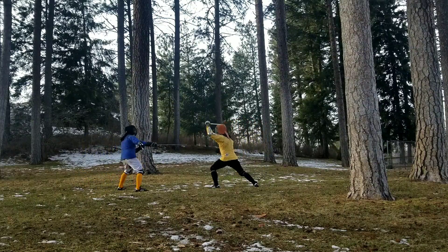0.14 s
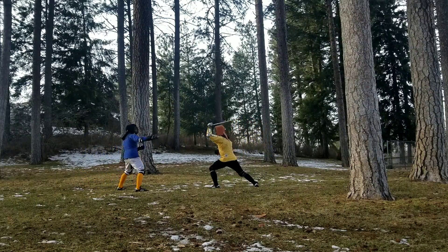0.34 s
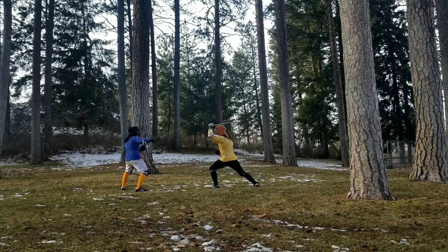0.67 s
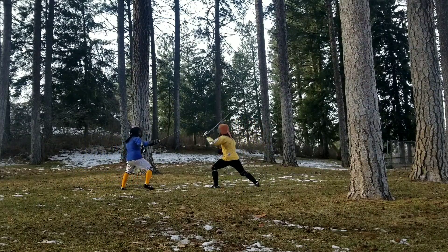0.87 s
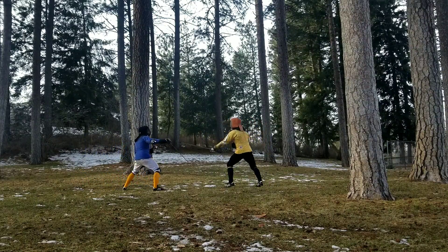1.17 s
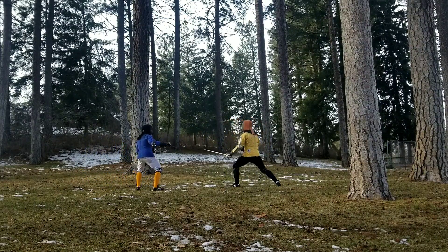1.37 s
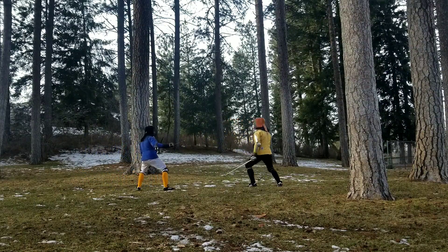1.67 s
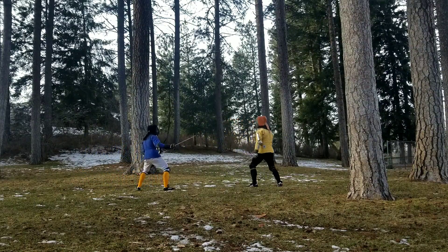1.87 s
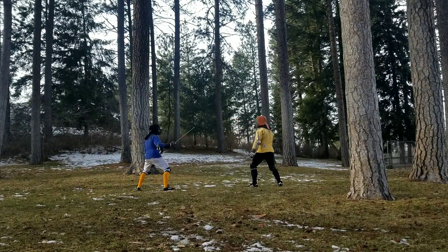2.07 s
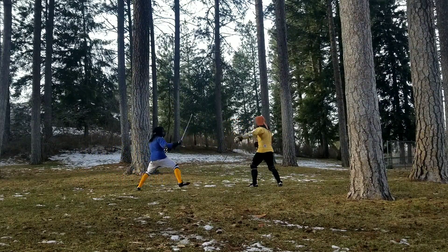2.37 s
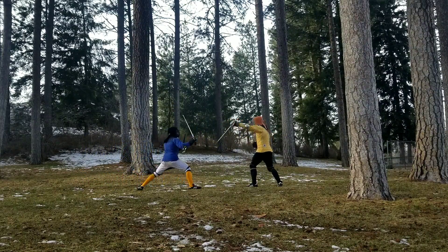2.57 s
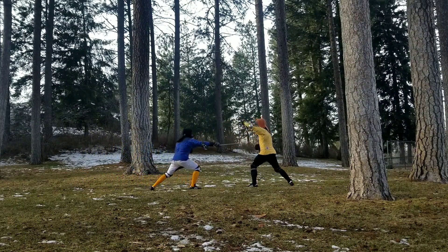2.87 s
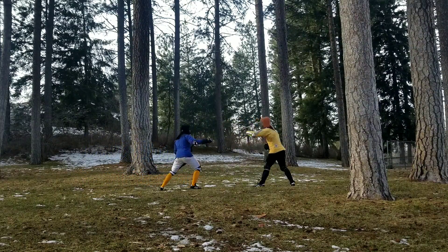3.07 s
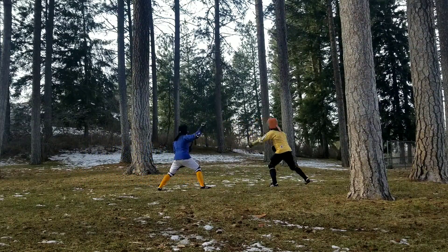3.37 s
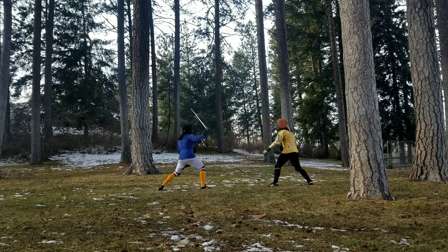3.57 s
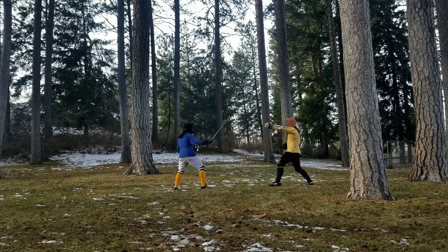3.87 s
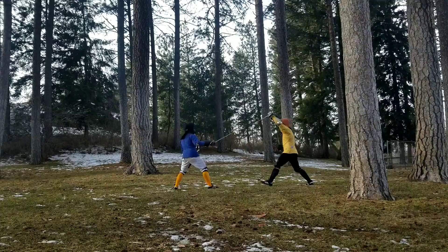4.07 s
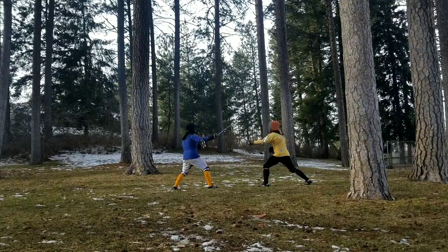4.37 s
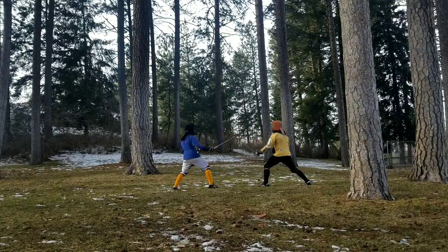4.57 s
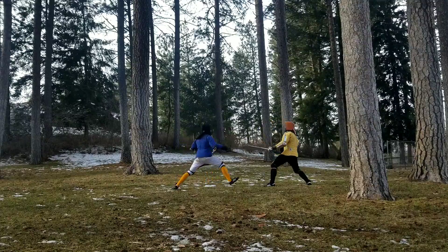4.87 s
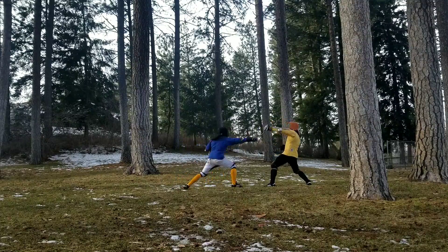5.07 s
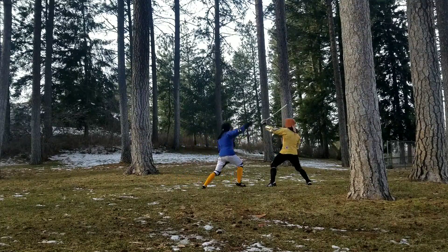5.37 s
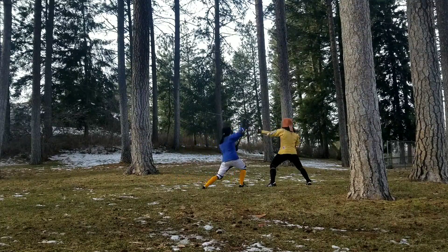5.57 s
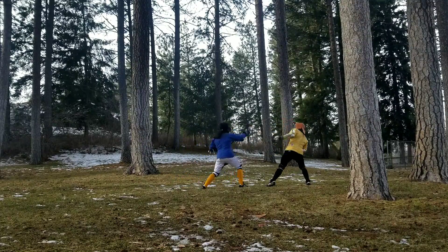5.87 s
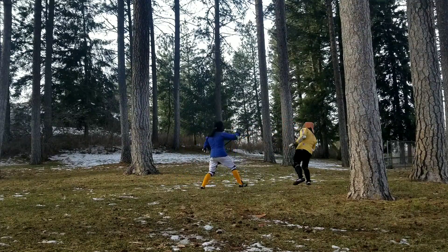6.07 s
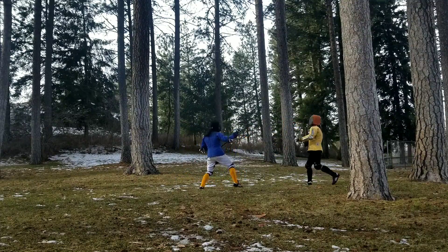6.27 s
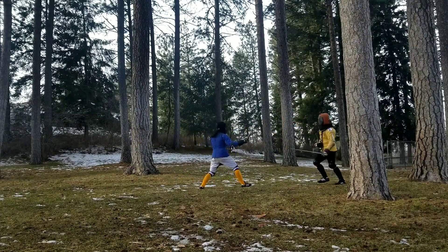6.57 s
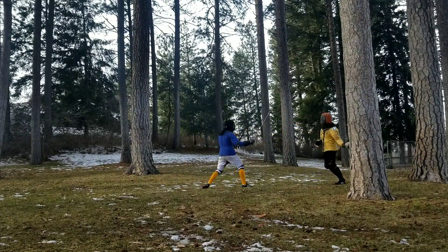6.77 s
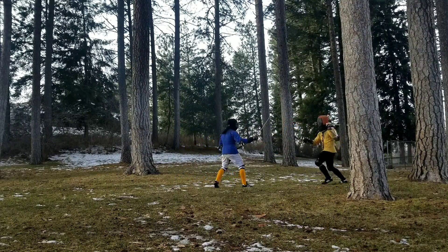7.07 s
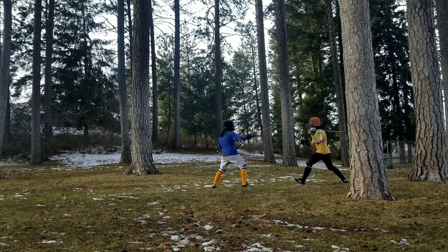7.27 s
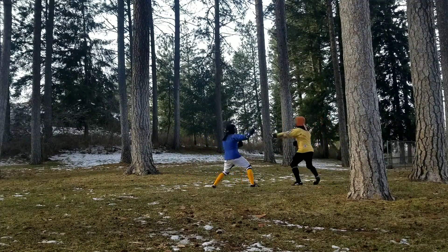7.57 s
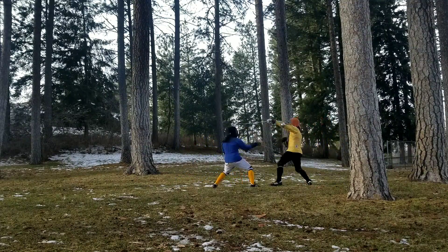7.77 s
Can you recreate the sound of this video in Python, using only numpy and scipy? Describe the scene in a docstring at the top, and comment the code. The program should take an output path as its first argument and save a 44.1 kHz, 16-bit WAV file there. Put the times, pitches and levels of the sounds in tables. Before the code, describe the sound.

Two fencers spar outdoors: sparse bright metallic clacks with short woodland echo, muffled knocks and scuffing feet over faint deep rumble.

```python
"""Steel swords clash as two fencers spar among tall pines: each blow excites broad blade resonances,
a low knock, a high sizzle and a thin ring, and the trunks scatter it into a smooth reverberant tail.
Blades also slide in uneven friction noise. Padded gear knocks as damped sines with puffs of noise,
shoes scuff and pat the turf, and faint tones waver.
Shaped noise gives a low, distant rumble, a soft rush in the pines and a faint hiss."""
import sys
import numpy as np
from scipy import signal
from scipy.fft import rfft, irfft, next_fast_len
from scipy.io import wavfile
from scipy.ndimage import uniform_filter1d, map_coordinates

SR = 44100
rng = np.random.default_rng(int(sys.argv[2]) if len(sys.argv) > 2 else 0)


def generate_wav(sig):
    """Save sig (samples, or channels by samples) to the path in sys.argv[1] as 16-bit PCM at SR."""
    pcm = np.round(np.clip(np.atleast_2d(sig).T, -1, 1) * 32767).astype(np.int16)
    wavfile.write(sys.argv[1], SR, pcm)


N = 349713
T = np.arange(SR // 2) / SR  # time axis of one event, s
HZ = np.fft.rfftfreq(2 ** 16, 1 / SR)  # frequency axis of the burst colours, Hz

# blade on blade: [t/s, level/dB, knock/dB, strongest mode f/Hz, mode/dB, chatter t60/s];
# knock and mode are relative to the level
BLOWS = [(1.096, -22, -3.5, 1640, -.5, .046), (2.79, -34.5, 2, 1163, 1, 0.06),
         (3.353, -29, -1.5, 3100, -10, 0.051), (3.357, -28, -1.5, 4260, -6, 0.088),
         (4.468, -21, -7, 4055, 6, 0.078), (5.079, -40.5, -2.5, 1025, 6.5, 0.051),
         (5.537, -28.5, -1.5, 6450, 6.5, 0.055), (5.553, -35.5, -2, 4420, -9, 0.096),
         (5.59, -37.5, 1.5, 1250, 1, 0.053), (5.857, -30.5, -5, 1130, 2, 0.068),
         (5.882, -36.5, -5, 4450, 6.5, 0.052), (7.285, -50, 6, 1023, 4, 0.078),
         (7.567, -24, -1.5, 4510, 1, 0.065), (7.884, -35, 8.5, 1624, 12, 0.022),
         (7.887, -30, -1.5, 3020, 9, .028)]
# slides or brushes of one blade along the other: [t/s, length/s, level/dB]
SLIDES = [(2.808, 0.045, -38.5), (4.38, 0.026, -59.5), (5.401, 0.057, -64)]
# dull knocks on gear and ground: [t/s, level/dB, f/Hz]
KNOCKS = [(1.062, -35.5, 510), (1.097, -31, 453), (1.222, -28, 276), (1.368, -31.5, 280), (1.662, -30, 248),
          (1.695, -30.5, 950), (1.755, -32.5, 720), (2.503, -31.5, 780), (2.902, -17.5, 1130),
          (2.903, -30.5, 520), (5.479, -26.5, 230), (5.519, -19.5, 58.55), (7.883, -25.5, 228)]
# scuffs of shoes and clothing, before the gains of their two bands: [t/s, level/dB]
SCUFFS = [(.251, -49), (1.003, -47), (1.051, -34.5), (2.299, -54), (3.721, -47), (4.151, -44.5),
          (5.232, -44), (5.29, -43)]
# flurries of steps on the turf: [middle t/s, length/s, level/dB]
FLURRIES = [(.15, .7, -47), (1.501, 0.97, -40), (3.2, 1.6, -38), (7.053, .8, -50.5)]
# faint, thin whistles: [t/s, length/s, mean f/Hz, level/dB]
WHISTLES = [(.2, 0.15, 1846, -58), (6.027, 0.17, 1992, -61.5)]

# broad resonances of the gripped swords: [f/Hz, half-power width/Hz, level/dB]
SWORD_MODES = [(1660, 370, -24.5), (2820, 380, -17.5), (3600, 200, -11), (4270, 420, -3.5),
               (5370, 110, -7.5), (6580, 82, -15.5), (7030, 120, -4.5), (8050, 57, -2.5), (8900, 130, -14),
               (10550, 310, -12.5), (12210, 330, -14)]
# thin, longer ring of the steel, before random detuning and strength: [f/Hz, level/dB, t60/s]
RING_MODES = [(2783, -1, .6), (3070, 0, .35), (3665, 0, .3), (3983, 0, .3), (4282, 0, .3), (5396, -3, .3),
              (6420, 0, .55), (7580, -1, .35), (7925, -5, .3), (8704, -5, .3), (9776, 1, .45),
              (11420, -4, .25), (12558, -2, .2)]
# relative spectrum of the low register of a clash: [f/Hz, level/dB per Hz]
KNOCK_SPECTRUM = [(100, -17), (300, -5.5), (450, -9.5), (600, -12), (800, -2), (1250, -0.5), (1800, -2),
                  (2150, -5.5), (3200, -25)]
# relative spectrum of the middle register: [f/Hz, level/dB per Hz]
CLANG_SPECTRUM = [(1500, -32), (2300, -3), (2900, 0), (4300, -2), (5400, -4.5), (6200, -7), (9000, -33.5)]
# relative spectrum of the high register: [f/Hz, level/dB per Hz]
SIZZLE_SPECTRUM = [(4000, -28), (6000, -11), (8000, 4), (9500, 0.5), (12000, 4.5), (14600, 0.5)]
# relative spectrum of brushed turf: [f/Hz, level/dB per Hz]
TURF_SPECTRUM = [(500, -20.5), (1500, -6), (3500, 3.5), (6000, -4), (12000, -25)]

# stereo balance of the direct sound: [f/Hz, left minus right/dB]
DIRECT_PAN = [(300, -2.5), (900, -9), (1600, -8.5), (3000, -12.5), (4500, -13), (6000, -0.5), (8000, 0.5),
              (14000, -1)]
# stereo balance of the scattered tail: [f/Hz, left minus right/dB]
WOOD_PAN = [(200, 6.5), (700, -8), (2400, -6), (4400, -6), (8000, 0.5)]
# decay time of the scattered tail: [f/Hz, t60/s]
WOOD_T60 = [(300, .8), (1200, 1.15), (3000, 1.03), (6000, 0.62), (13000, 0.49)]
# colour of the scattered tail: [f/Hz, level/dB]
WOOD_COLOUR = [(150, -8.5), (400, -8), (1000, -1), (2500, -1.5), (4300, -3), (7000, 4.5), (14000, 3.5)]

# relative spectrum of the distant rumble: [f/Hz, level/dB per Hz]
RUMBLE_SPECTRUM = [(18, -57), (25, -42.5), (31, -29.5), (40, 0.5), (55, -2), (80, 4), (98, 2.5), (125, 0.5),
                   (155, -5.5), (200, -5), (260, -9), (330, -18), (430, -21.5), (700, -64.5)]
# course of the rumble, before a common offset and random wobble: [t/s, level/dB]
RUMBLE_COURSE = [(0.0, -40), (0.49, -40.5), (2.45, -43), (2.98, -40.5), (6.67, -45), (7.07, -41),
                 (7.93, -45.5)]
# relative spectrum of the rush in the pines: [f/Hz, level/dB per Hz]
RUSH_SPECTRUM = [(250, -14.5), (450, 2.5), (620, 4.5), (800, 10.5), (1050, 10), (1400, 6), (1900, 1.5),
                 (2400, -11.5), (3600, -17), (5000, -26.5), (7000, -97), (10000, -67)]
# relative spectrum of the microphone hiss: [f/Hz, level/dB per Hz]
HISS_SPECTRUM = [(4000, -22), (8000, -19), (9800, -12), (11000, -2), (12500, 0), (14600, -.5)]
# stereo balance of the background and the dull knocks: [f/Hz, left minus right/dB]
AIR_PAN = [(100, -3), (700, -5.5), (1300, -6.5), (2400, -9.5), (4400, -10), (8000, -1.5)]
# left-right correlation of the background before panning: [f/Hz, correlation]
AIR_ALIKE = [(60, 0.97), (130, 0.97), (290, 0.82), (640, 0.14), (1400, 0)]

USUAL_BLOW_DB = -32  # a blow of middling strength
# ring and sizzle of a middling blow, relative to it, and their dB for each dB of the blow;
# growth below 1 gives light touches relatively more of both
RING_DB, RING_GROWTH = -25, 0.72
SIZZLE_DB, SIZZLE_GROWTH = 1.5, 0.9
SLIDE_RISE_S, SLIDE_T60 = .004, 0.078
KNOCK_CYCLES = 12.3  # a knock loses 60 dB within this many cycles
STANCE_DB = -58  # the feet shift a little all the time
RUSH_DB, RUSH_EASE_DB_PER_S = -54, 0.52  # the breeze in the pines slowly drops
TOP_HZ = 14720  # band limit of the whole sound


def clashes(clang_db=2, contact=0.00086, mode_t60=0.035, rise=0.00027):
    """Impact excitation: chattering blades drive modes that the grip damps, all but a thin ring."""
    out = np.zeros((2, N))
    ring_hz, ring_level, ring_t60 = np.transpose(RING_MODES)[:, :, None]
    onset = 1 - np.exp(-T / rise)
    for s, db, knock_db, mode_hz, mode_db, t60 in BLOWS:
        envelope = onset * fade(t60, np.maximum(T - contact, 0))
        above_usual = db - USUAL_BLOW_DB
        sizzle_db = SIZZLE_DB + (SIZZLE_GROWTH - 1) * above_usual
        clack = blade_noise(envelope, (knock_db, clang_db, sizzle_db), alike=0.85, spiky=.65)
        # the place of contact picks one mode above the others and gives the ring new strengths
        mode = amp(mode_db) * np.sin(2 * np.pi * mode_hz * T) * fade(mode_t60)
        strength, detune = rng.standard_normal((2, len(RING_MODES), 1))
        tones = np.sin(2 * np.pi * ring_hz * (1 + 0.0024 * detune) * T)
        ring = amp(ring_level + 1.2 * strength) * tones * fade(ring_t60)
        ring_db = RING_DB + (RING_GROWTH - 1) * above_usual
        tonal = onset * (mode + amp(ring_db) * ring.sum(axis=0))
        add(out, s, among_trees(amp(db) * (clack + tonal), wet_db=-9.5))
    return out


def slides(knock_db=-6, sizzle_db=-4, judder_db=2.5):
    """Friction excitation: edge grates on edge under an uneven pressure that bites and lets go."""
    out = np.zeros((2, N))
    for s, length, db in SLIDES:
        pressure = (1 - np.exp(-T / SLIDE_RISE_S)) * fade(SLIDE_T60, np.maximum(T - length, 0))
        envelope = pressure * amp(db + judder_db * wobble(330)[:len(T)])
        grate = blade_noise(envelope, (knock_db, 0, sizzle_db), spiky=0.97)
        add(out, s, among_trees(grate, wet_db=-8.5, build=0.026))
    return out


def blade_noise(envelope, levels_db, **grain):
    """Superposition: low, middle and high registers are radiated through one steel response."""
    body = steel()
    shapes = (KNOCK_SPECTRUM, CLANG_SPECTRUM, SIZZLE_SPECTRUM)
    return sum(amp(level) * burst(envelope, body * amp(along(shape, HZ)), **grain)
               for shape, level in zip(shapes, levels_db))


def steel(dense_db=-10, uneven_db=2.5):
    """Modal response at one place of contact: broad resonances over a dense bed of bending modes."""
    peaks = sum(amp(db) ** 2 / (1 + (2 * (HZ - hz) / width) ** 2) for hz, width, db in SWORD_MODES)
    place = rng.standard_normal(len(HZ))
    place = unit(uniform_filter1d(uniform_filter1d(place, size=200), size=200))
    return np.sqrt(peaks + amp(dense_db) ** 2) * amp(uneven_db * place)


def burst(envelope, gain, alike=0.89, spiky=0.95):
    """Shot noise: a stereo swarm of tiny contacts rings through a minimum-phase colour."""
    noise = rng.standard_normal((3, len(T))) * np.exp(spiky * rng.standard_normal(len(T)))
    share = np.clip(alike, 0, 1)
    force = envelope * (np.sqrt(share) * noise[0] + np.sqrt(1 - share) * noise[1:])
    # folding the cepstrum onto positive time makes the colour causal
    cepstrum = irfft(np.log(gain + 1e-6))
    n = len(cepstrum)
    colour = np.exp(rfft(2 * cepstrum[:n // 2], n))
    x = irfft(rfft(force, n) * colour)[:, :len(T)]
    return unit(x) * np.sqrt(np.mean(envelope ** 2))


def among_trees(x, wet_db, build=0.0066, lead=2.4e-5):
    """Multiple scattering: direct sound meets two ports a hair apart; in the tail the treble dies first."""
    hz, t, z = signal.stft(rng.standard_normal((2, SR)), SR, nperseg=256)
    # single trunks throw back glints, so the tail shimmers
    glints = uniform_filter1d(rng.standard_normal(z.shape[1:]), size=3, axis=0)
    glints = unit(uniform_filter1d(glints, size=7, axis=1))
    z = z * amp(2.2 * glints)
    decay = fade(along(WOOD_T60, hz)[:, None], t)
    tail = signal.istft(z * decay, SR, nperseg=256)[1][:, :SR]
    tail = tail * (1 - np.exp(-np.arange(SR) / SR / build))
    # every direction carries other fine detail, so the tail keeps only the broad colour
    power = np.mean(np.abs(rfft(x)) ** 2, axis=0)
    power = uniform_filter1d(uniform_filter1d(power, size=1000), size=700)

    def tail_response(f):
        """Spectral smoothing: the broad source spectrum is weighted by the wood's colour and balance."""
        broad = np.sqrt(np.abs(np.interp(f, np.fft.rfftfreq(len(T), 1 / SR), power)))
        return broad * sides(along(WOOD_PAN, f)) * amp(wet_db + along(WOOD_COLOUR, f))

    def direct_response(f):
        """Interaural-style difference: level balance and a right-hand delay of lead seconds."""
        late = np.exp(-2j * np.pi * f * lead * np.array([[0], [1]]))
        return sides(along(DIRECT_PAN, f)) * late

    out = filtered(tail / np.linalg.norm(tail[0]), tail_response)
    add(out, 0, filtered(x, direct_response))
    return out


def knocks(puff_db=-5):
    """Heavily damped oscillation: a few cycles of one low mode and a puff of noise around it."""
    out = np.zeros((2, N))
    for s, db, hz in KNOCKS:
        envelope = (1 - np.exp(-T * hz)) * fade(KNOCK_CYCLES / hz)
        puff = burst(envelope, 1 / np.sqrt(1 + (HZ / hz - hz / (HZ + 1)) ** 4))
        tone = envelope * np.sin(2 * np.pi * hz * T)
        add(out, s, amp(db) * (tone + amp(puff_db) * puff))
    return filtered(out, lambda hz: sides(along(AIR_PAN, hz)))


def scuffs(turf_db=-14, treble_db=-10, rise=.006, t60=.09):
    """Friction noise: short brushes of shoes on turf and of stiff clothing."""
    out = np.zeros((2, N))
    envelope = (1 - np.exp(-T / rise)) * fade(t60)
    for s, db in SCUFFS:
        low = amp(turf_db) * burst(envelope, amp(along(TURF_SPECTRUM, HZ)), spiky=.6)
        high = amp(treble_db) * burst(envelope, amp(along(SIZZLE_SPECTRUM, HZ)), spiky=0.78)
        add(out, s, among_trees(amp(db) * (low + high), wet_db=-27.5))
    return out


def patter(count=520, centre_hz=600, spread=0.5, cycles=7.5, scatter_db=5.0, pat_db=-1):
    """Lossy yielding: damp turf gives under the shifting feet in small, dull, damped sines."""
    out, t = np.zeros((2, N)), T[:SR // 10]
    for s, (pitch, size, pan) in zip(rng.uniform(0, N / SR, count), rng.standard_normal((count, 3))):
        hz = centre_hz * np.exp(spread * np.clip(pitch, -2, 2))
        gain = footwork(s) * amp(pat_db + scatter_db * np.clip(size, -2, 2))
        pat = np.sin(2 * np.pi * hz * t) * (1 - np.exp(-2 * t * hz)) ** 2 * fade(cycles / hz, t)
        add(out, s, gain * sides(3 * pan - 5) * pat)
    return out


def footwork(s):
    """Excitation strength of the feet at time s, as a gain: each flurry swells and settles."""
    middle, length, db = np.transpose(FLURRIES)
    swell = np.cos(np.pi * np.clip((s - middle) / length, -.5, .5))
    return amp(STANCE_DB) + np.sum(amp(db) * swell)


def whistles(waver=0.0055):
    """Frequency modulation: faint, thin tones waver at random as they swell and vanish."""
    out = np.zeros((2, N))
    for s, length, hz, db in WHISTLES:
        phase = 2 * np.pi * np.cumsum(hz * (1 + waver * wobble(55)[:len(T)])) / SR
        swell = np.sin(np.pi * np.minimum(T / length, 1))
        add(out, s, amp(db) * sides(-7) * np.sin(phase) * swell)
    return out


def air(rumble_db=1.37, hiss_db=-79):
    """Stationary noise, slowly modulated: far rumble, soft rush in the pines, steady microphone hiss."""
    t = np.arange(N) / SR
    rumble_course = np.interp(t, *np.transpose(RUMBLE_COURSE)) + rumble_db
    rumble = amp(rumble_course + 1.3 * wobble(4.5)) * wash(RUMBLE_SPECTRUM)
    rush = amp(RUSH_DB - RUSH_EASE_DB_PER_S * t + 1.4 * wobble(14)) * wash(RUSH_SPECTRUM)
    return rumble + rush + amp(hiss_db) * wash(HISS_SPECTRUM)


def wash(spectrum):
    """Diffuse field: the bass is alike on both sides, the treble unrelated."""
    def mid_side(hz):
        """Correlation as an angle: cosine and sine share the power between mid and side."""
        turn = np.arccos(np.clip(along(AIR_ALIKE, hz), -1, 1)) / 2
        return amp(along(spectrum, hz)) * [np.cos(turn), np.sin(turn)]

    mid, side = filtered(rng.standard_normal((2, N)), mid_side)
    pair = np.array([mid + side, mid - side]) / mid.std()
    return filtered(pair, lambda hz: sides(along(AIR_PAN, hz)))


def amp(db):
    """Level to amplitude: 20 dB is a factor of ten."""
    return 10 ** (np.asarray(db) / 20)


def unit(x):
    """Normalisation: x at rms 1."""
    return x / np.sqrt(np.mean(x ** 2) + 1e-20)


def along(points, hz):
    """Interpolation: (f/Hz, value) points read on a logarithmic frequency axis."""
    f, v = np.transpose(points)
    return np.interp(np.log(hz + 1), np.log(f + 1), v)


def fade(t60, t=T):
    """Exponential decay: the level falls 60 dB in t60 seconds."""
    return np.exp(-np.log(1000) * t / np.maximum(t60, 1e-3))


def wobble(rate):
    """Random modulation: a smooth curve through rate random knots a second."""
    knots = rng.standard_normal(int(N * rate / SR) + 4)
    return map_coordinates(knots, [np.arange(N) * rate / SR])


def filtered(x, response):
    """Linear filtering: the spectrum of x times a response of frequency."""
    n = x.shape[-1]
    m = next_fast_len(n + SR // 4)
    return irfft(rfft(x, m) * response(np.fft.rfftfreq(m, 1 / SR)), m)[..., :n]


def sides(pan_db):
    """Level difference: left and right gains whose mean is 1."""
    pair = amp(np.array([pan_db, -pan_db]) / 2).reshape(2, -1)
    return pair / pair.mean(axis=0)


def add(track, s, x):
    """Superposition: mix x into the track from time s."""
    part = track[:, max(round(s * SR), 0):][:, :x.shape[-1]]
    part += x[..., :part.shape[1]]


def scene():
    """Superposition of all sources of the bout in the clearing."""
    return clashes() + slides() + knocks() + scuffs() + patter() + whistles() + air()


def record(dry):
    """Band limiting: a very steep low-pass at TOP_HZ."""
    return filtered(dry, lambda hz: 1 / np.sqrt(1 + (hz / TOP_HZ) ** 300))


dry = scene()
out = record(dry)
generate_wav(out)
```